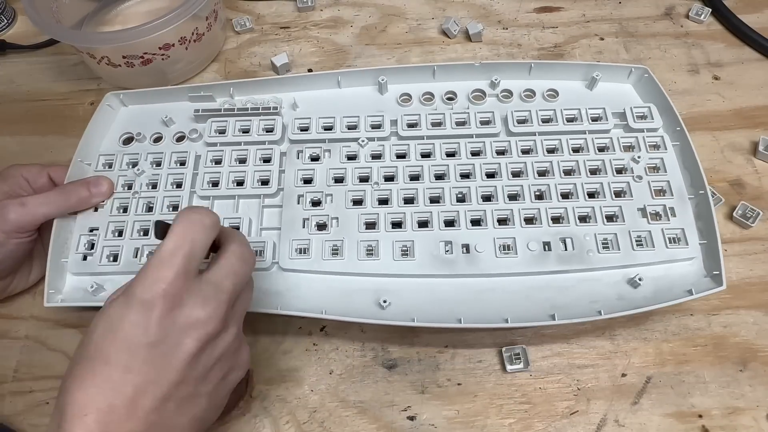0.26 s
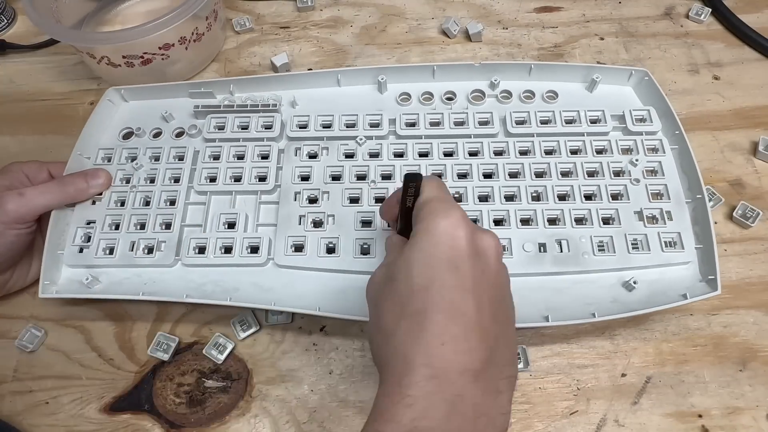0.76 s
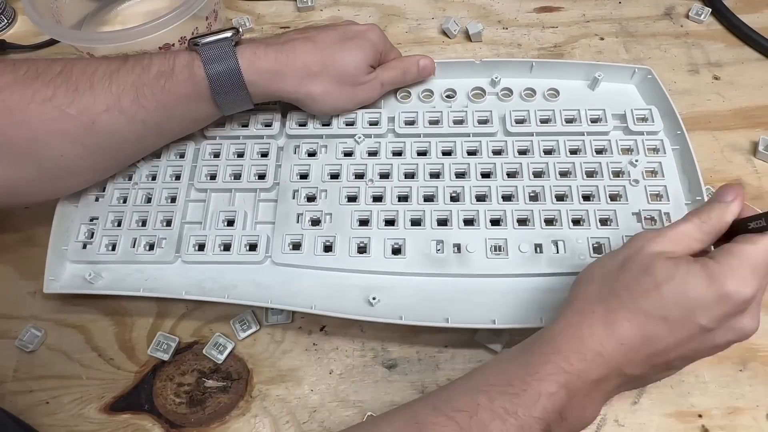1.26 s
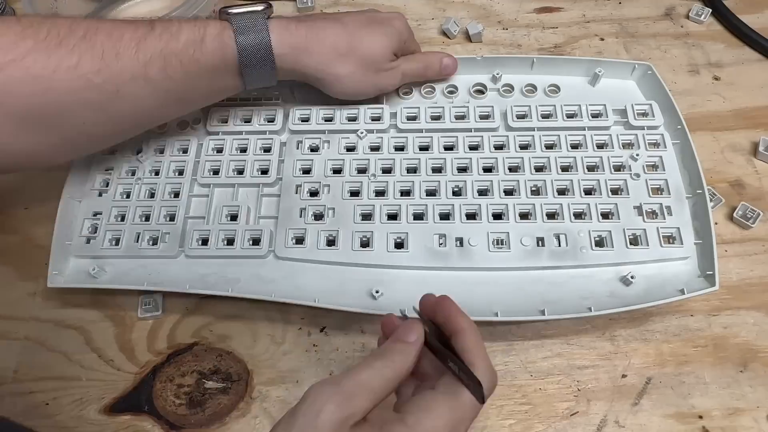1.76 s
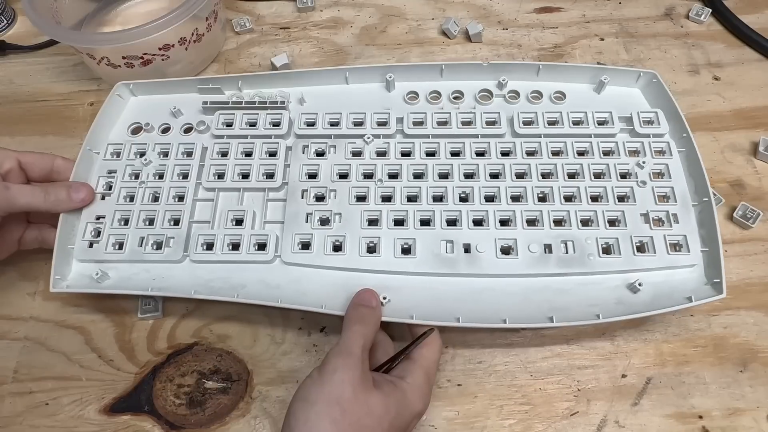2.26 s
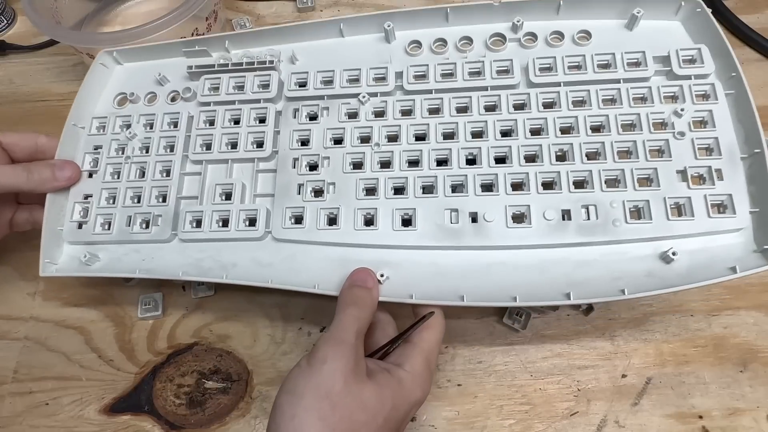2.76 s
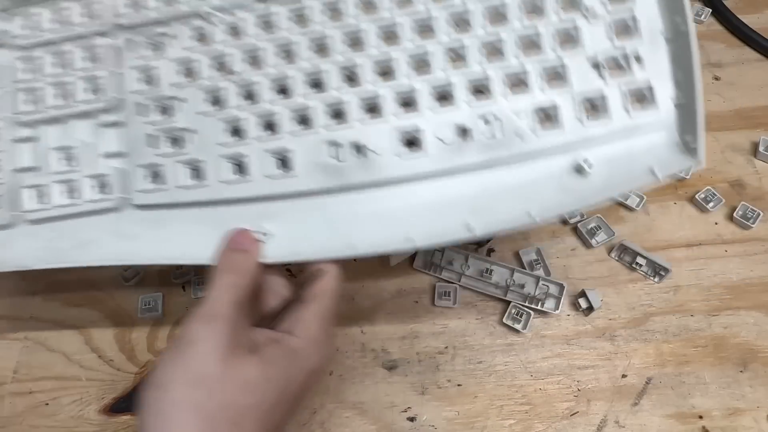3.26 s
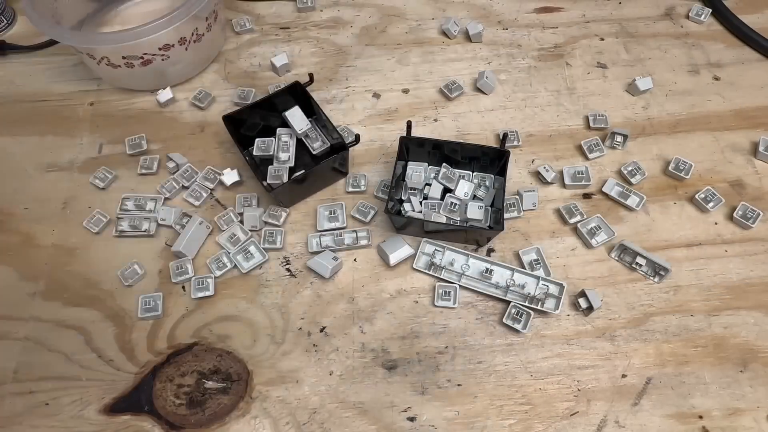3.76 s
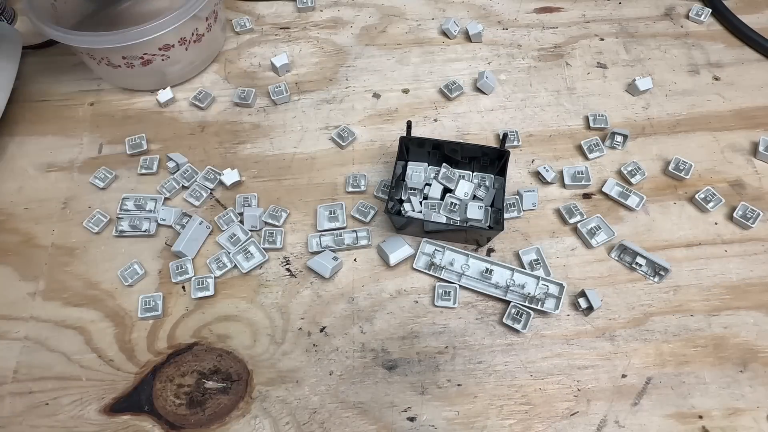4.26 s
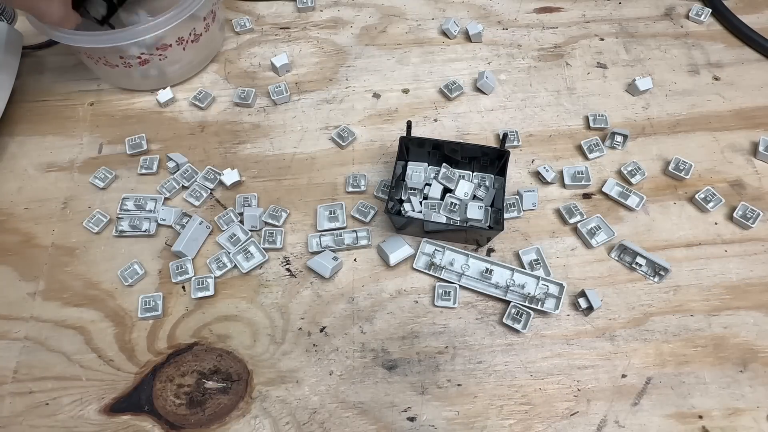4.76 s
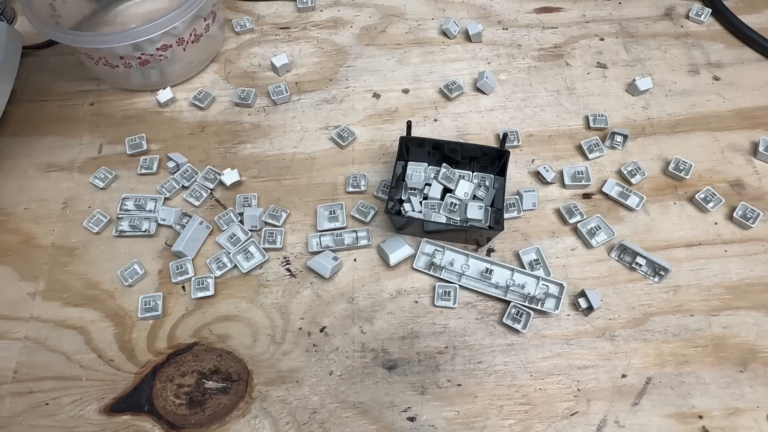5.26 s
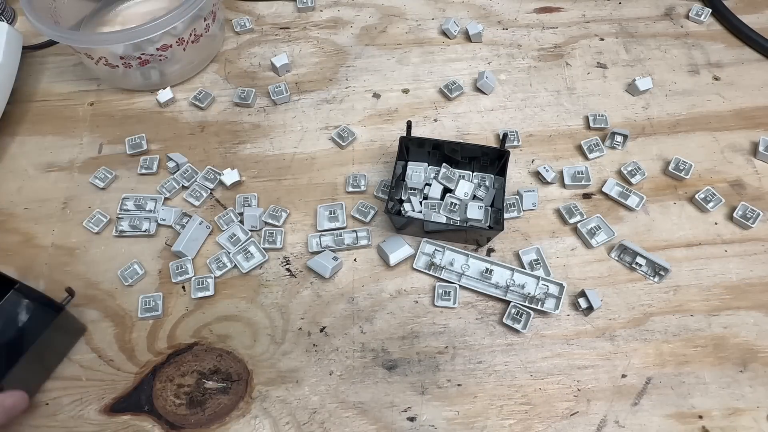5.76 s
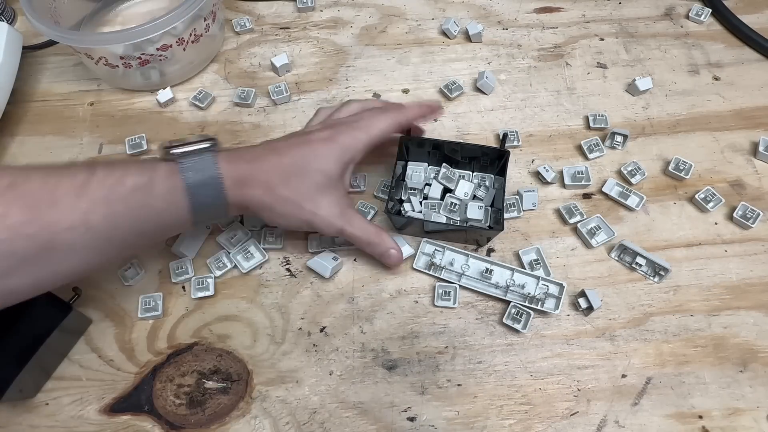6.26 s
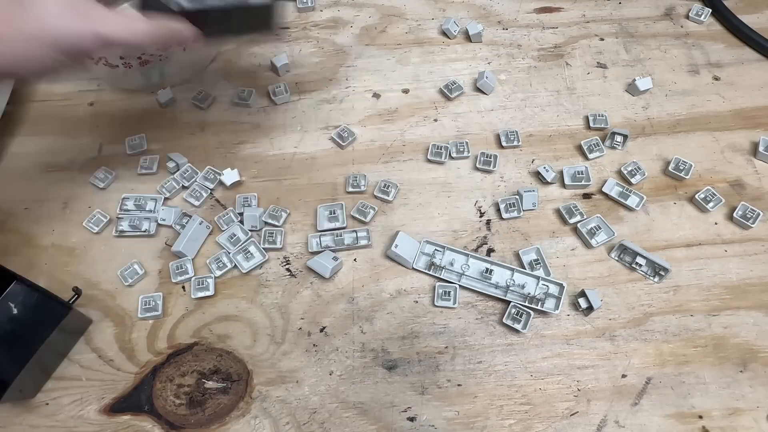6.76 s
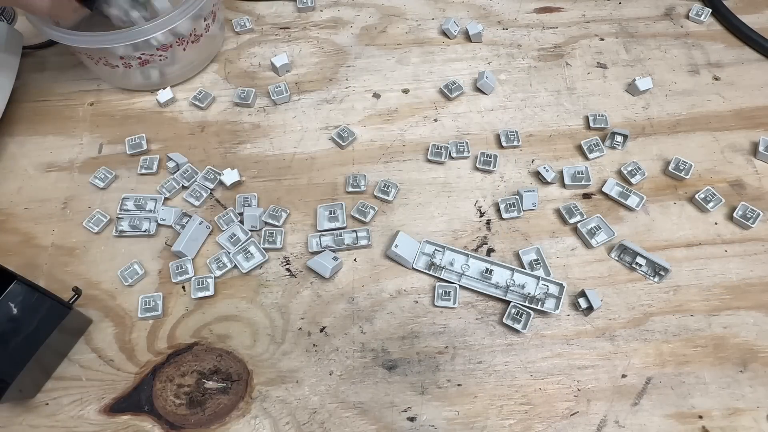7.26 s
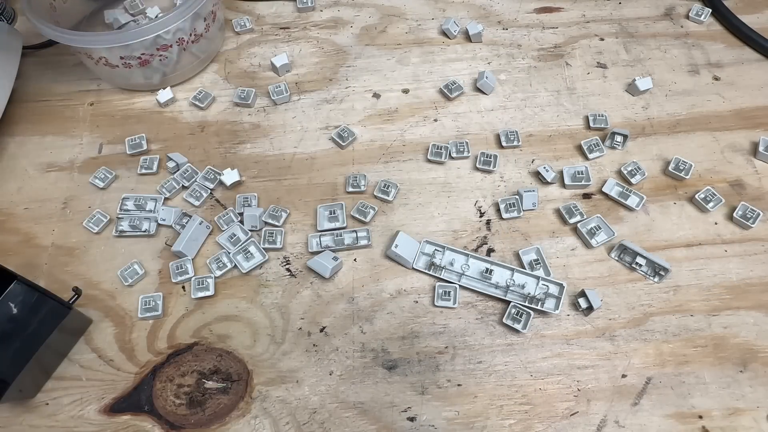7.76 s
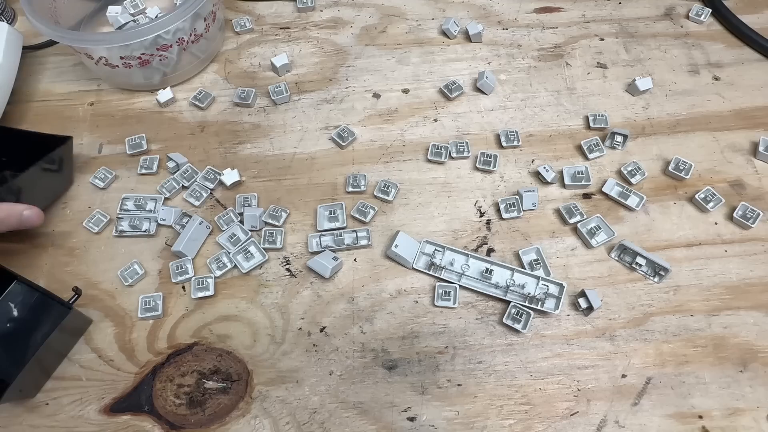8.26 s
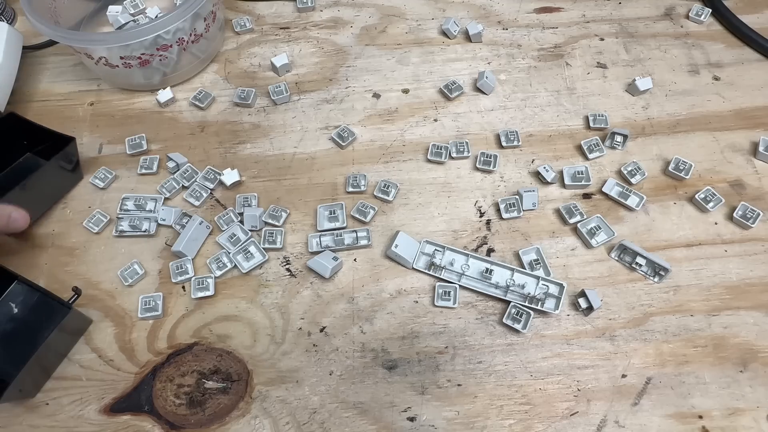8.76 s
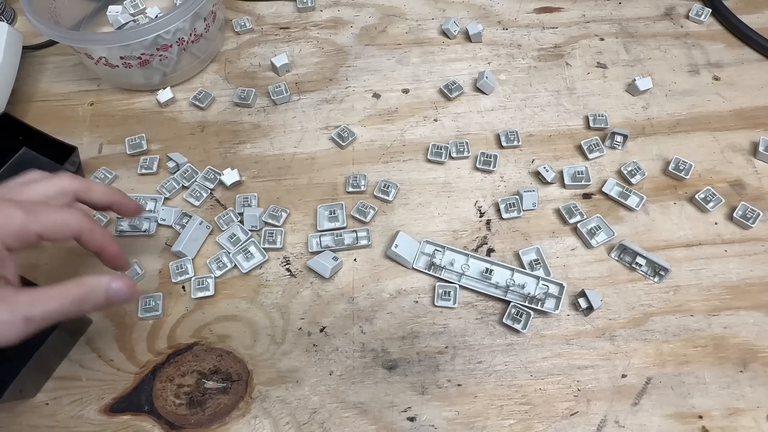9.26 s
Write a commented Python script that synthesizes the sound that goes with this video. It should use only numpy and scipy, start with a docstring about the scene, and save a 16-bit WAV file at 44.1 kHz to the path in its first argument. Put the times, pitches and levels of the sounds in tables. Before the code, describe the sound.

A close, fairly dry pickup at a wooden bench in a small room with faint low ventilation rumble and hiss. From 0 to 2 seconds, keycaps are pried out of a plastic keyboard: choppy snaps and clicks in brief slices, strongest between about 0.85 and 1.2 and again near 1.9. A light knock falls at 2.3, then near quiet. Soft hand brushing passes around 3.3 to 3.7. From 3.9 a small box of caps rattles increasingly, then pours at 4.65 into a plastic tub in a bright, hollow clatter, thinning by 5.1. The empty box knocks down at 5.7 and 5.8. At 6.3 a second box is jolted sharply, rattles lightly from 6.7, surges at 7.1 and pours from 7.25 to about 7.6, with last stragglers near 7.8. Several woody plastic knocks follow from 8.0 to 8.9, then a faint brush at 9.3 to 9.5.

```python
"""Keycaps are pried out of a keyboard at a workshop bench, in short slices of clatter that fade in and out.
A knock and brushing hands follow; a small open box of caps rattles, pours into a plastic tub and is set down.
A second box is jolted, rattled, poured and set down with several knocks; hands brush past at the end.
Blows ring sets of decaying sine waves, crowds of blows make clatter, and shaped noise makes the brushing,
the ventilation rumble and the hiss; random echoes of a small room answer all but the slices and the air."""
import sys
import numpy as np
from scipy import signal
from scipy.io import wavfile
from scipy.ndimage import uniform_filter1d

SR = 44100
rng = np.random.default_rng(int(sys.argv[2]) if len(sys.argv) > 2 else 0)


def dump(signal):
    """Clip the signal to [-1, 1] and save it as 16-bit WAV at the path in sys.argv[1]."""
    limited = np.clip(np.atleast_2d(signal).T, -1, 1)
    pcm = np.round(limited * 32767).astype(np.int16)
    wavfile.write(sys.argv[1], SR, pcm)


N = 418950  # length in samples
KINDS = 32  # different versions of each blow
BAND_LIMIT_HZ = 15900

# Ventilation rumble and hiss, shape of the noise: f/Hz, relative level/dB per Hz
RUMBLE_SPECTRUM = [(8.8, -63), (15, -33), (27, -23), (34, -8), (42, -3), (59, 1), (87, -7), (103, -8),
                   (124, -22), (190, -29), (250, -59), (420, -120)]
HISS_SPECTRUM = [(100, -4), (160, -10), (350, -9), (1100, -15), (1700, -12), (2000, -5), (2500, -5),
                 (2900, -17), (5000, -21), (5600, -8), (6800, -8), (7800, -12), (8700, -31), (16000, -35)]
# Brief swells of the rumble: t/s, hold/s, level/dB
RUMBLE_SWELLS = [(.26, .01, -48), (.5, .2, -58), (.9, .7, -60), (1.22, .01, -52), (1.71, .03, -42),
                 (2.38, .02, -59), (3.67, .01, -54), (3.91, .01, -56), (4.84, .11, -53), (5.16, .01, -57),
                 (6.52, .02, -55), (7.43, .01, -52), (7.65, .01, -53), (8.3, .11, -57), (9.07, .01, -57),
                 (9.42, .02, -59)]
# How long the room echoes: f/Hz, time to fall 60 dB/s
ROOM_DECAY = [(100, 1), (500, 0.34), (1500, 0.37), (4000, .35), (8000, 0.094), (16000, 0.34)]
# Hands and sleeves brushing past: t/s, hold/s, swish level/dB, low rub level/dB
BRUSHES = [(3.056, .01, -73.5, -95), (3.33, .07, -69, -76), (3.56, .01, -66, -78), (3.615, .055, -55, -65),
           (3.72, .06, -63, -75), (5.46, .01, -78.5, -82), (5.685, .01, -64, -68), (9.28, .14, -73, -67),
           (9.5, .01, -63.5, -82)]
# Colour of the swish and of the low rub: f/Hz, relative level/dB per Hz
SWISH_SPECTRUM = [(880, -38), (1500, -3), (3310, -4.5), (3590, -6), (5380, 3), (11200, -22.5),
                  (14600, -12.5), (16000, -9)]
RUB_SPECTRUM = [(100, -45), (170, -1), (287, -8), (515, -4.5), (746, -21.5), (900, -27.5), (1170, -60),
                (1980, -120)]

# Ringing tones of each body, before random variation: f/Hz, relative level/dB, time to fall 60 dB/s
TUB_MODES = [(362, -11, 0.045), (454, -7, 0.07), (520, -2, 0.1), (615, 3, .06), (642.3, 4.5, .07),
             (693.8, 3, 0.09), (765, -2.5, 0.11), (860, -13, 0.022)]
BOX_MODES = [(1113, -17, 0.018), (1230, -10, 0.03), (1313, 0, .05), (1370, 1, 0.045), (1445, 0, 0.06),
             (1505, 2, 0.08), (1546, -5, 0.05), (1695, -11, 0.047)]
EMPTY_BOX_MODES = [(1054, -24, 0.039), (1116, -13, 0.073), (1227, -12, .07), (1291, 0, .09),
                   (1346, -3.5, .08), (1488, -0.5, 0.065), (1546, -11, 0.072), (1720, -11, 0.045),
                   (1880, -17, 0.04)]
BOX_FLOOR_MODES = [(626, -18, .05), (700, -14, .07), (744, 4, .16), (788, -16, .05), (895, -18, .05)]
WOOD_MODES = [(200, -7, .04), (250, -5, .04), (291.4, -2, .05), (343, -3, .04), (389, -3, .04),
              (441, -1, .06), (500, -3, .04), (580, -5, .04)]
THUMP_MODES = [(96.7, -9.5, .15), (125, 7.5, 0.33), (160, -22, 0.089)]
SHELL_MODES = [(310, -13, 0.018), (513, -6.5, .025), (634, -0.5, 0.03), (756, 3.5, 0.035), (906, -2, 0.013)]  # keyboard shell
# Outline filled with random tones, for caps, edge clicks and the duller snap of box on wood:
# f/Hz, relative level/dB
CAP_SPECTRUM = [(1120, -35), (1900, -12.5), (2340, -1), (3260, -2.5), (4750, -1.5), (5300, 3), (6770, -7),
                (7600, -30.5), (9880, -44), (16700, -120)]
EDGE_SPECTRUM = [(4470, -32), (7600, 5), (9220, -1), (10400, -6), (13300, -8.5), (16000, -13)]
CRACK_SPECTRUM = [(1120, -31), (1900, -8), (3350, -5), (3890, -3.5), (4230, -4), (9000, -46), (11700, -62),
                  (19800, -120)]

# Box or shell meeting the bench: t/s, then level/dB of wood, thump, box floor, empty box, crack
BENCH_KNOCKS = [(2.309, -41, -59, -58, -30.5, -40.5), (5.704, -36, -62, -38, -22.5, -60),
                (5.805, -31.5, -57, -36, -11, -40), (6.296, -38, -54, -65, -50, -50),
                (8.022, -59, -62, -66, -50, -47), (8.105, -33, -53, -50, -28, -30),
                (8.155, -46, -52, -59, -41, -44), (8.189, -55, -52, -62, -47, -45),
                (8.275, -32, -48.5, -49, -38, -42.5), (8.314, -35.5, -50, -44, -32, -50),
                (8.414, -45.5, -55, -51, -38, -44.5), (8.591, -33.5, -64, -50, -34, -43.5),
                (8.603, -42, -56, -44, -43, -54), (8.911, -35.5, -64, -28, -25, -65)]
# Fine rattle of things settling after a pour or a box set down: t/s, hold/s, level/dB, fall/dB per s
SETTLING = [(5.71, .05, -71, 100), (5.85, .04, -60, 120), (7.8, .1, -71, 30), (8.12, .05, -70, 40),
            (8.28, .05, -70, 40), (8.6, .02, -73, 40), (8.92, .02, -80, 40)]
# A full box carried and tilted: start t/s, end t/s, start level/dB, end level/dB
CARRIED_BOXES = [(3.87, 4.64, -66, -46), (6.66, 7.09, -74, -62)]
# Added to the settling, carried and early handling clatter: level/dB of cap, tub, box, edge click
SETTLE_MIX = [0, 4, 3, -24]
RATTLE_MIX = [0, -10, 9, -24]
HANDLING_MIX = [-71, -69, -74, -90]
# Prying and falling caps: peak t/s, level/dB of shell, box, cap, basic time to fall 10 dB/s
PRY_SLICES = [(.042, -36.5, -35.5, -43, .016), (.0778, -62, -45, -39, .0044),
              (.1248, -41.5, -44.5, -50, .0063), (.2563, -49, -45.5, -51, .013),
              (.3015, -45.5, -43, -45, .0055), (.3465, -50, -42.5, -46, .0044),
              (.3985, -50, -42.5, -40, .012), (.4611, -44.5, -37.5, -39.5, .009),
              (.4986, -61, -61, -49, .0077), (.532, -62, -54, -59, .009), (.5544, -43, -40, -36, .0085),
              (.6412, -47, -37, -31.5, .005), (.665, -62, -48, -49, .011), (.7322, -63, -69, -56, .019),
              (.7505, -65, -61, -50, .0043), (.774, -52, -46, -51, .0086),
              (.7981, -46.5, -51, -48.5, .0076), (.8237, -50, -59, -67, .004),
              (.858, -30, -26.5, -23, .0095), (.912, -62.5, -59, -80, .014), (.9595, -32, -27.5, -25, .012),
              (.99, -57, -52.5, -46, .0072), (1.0349, -57, -75, -55, .013), (1.0699, -51, -67, -59, .0062),
              (1.0907, -32.5, -24, -25, .011), (1.1555, -61.5, -58.5, -70, .023),
              (1.197, -39, -24, -25.5, .011), (1.223, -62, -43.4, -40, .0054),
              (1.2766, -59.5, -63.5, -64, .008), (1.3242, -56, -58, -68, .008),
              (1.347, -53, -54.5, -59, .027), (1.3959, -52, -52, -55, .0083),
              (1.4523, -46.5, -44.5, -40, .011), (1.5338, -69, -64.5, -64, .0067),
              (1.5649, -58, -64, -68, .0125), (1.6342, -56, -50.5, -57, .027),
              (1.713, -33.5, -35.5, -29, .012), (1.792, -37, -44, -47, .0095),
              (1.9041, -37, -25, -19.5, .007), (1.9912, -59, -51.5, -51, .0043)]
# Caps knocking about in a box: t/s, level/dB of cap, box, edge click
BOX_RATTLES = [(3.3233, -53.5, -63, -75), (3.3643, -51, -55.5, -79), (3.5594, -43.5, -60.5, -57),
               (3.6125, -47, -51, -48), (3.6465, -56, -61, -44), (3.8587, -52, -49, -85),
               (3.8708, -48, -41, -79), (3.881, -46, -41, -79), (3.9137, -40, -38, -69),
               (3.924, -44, -34, -70), (3.9633, -45, -40, -66), (3.984, -21.5, -25.5, -47),
               (4.0145, -41, -31, -66), (4.0696, -37, -41, -65), (4.095, -30.5, -31.5, -55),
               (4.141, -31.5, -31, -62), (4.154, -31, -31, -56), (4.184, -36, -30, -62),
               (4.193, -18, -19, -45), (4.2614, -48, -28, -67), (4.2838, -41, -41, -67),
               (4.3058, -37.5, -43, -73), (4.353, -51, -41, -66), (4.3797, -30, -27, -46),
               (4.4087, -16, -21.5, -26), (4.4845, -27.5, -20, -58), (4.5271, -24, -23.5, -48),
               (4.559, -13, -18, -26), (4.6084, -25, -40, -34), (4.6355, -26, -45, -37),
               (5.7294, -42, -43, -78), (5.7608, -44, -37, -64), (5.7967, -27, -29.5, -69),
               (5.8397, -30.5, -29, -64), (5.9104, -52, -42.5, -83), (6.27, -40.5, -43, -51),
               (6.2942, -16.5, -33, -27), (6.337, -23, -32, -41), (6.3659, -34, -28, -57),
               (6.3919, -33.5, -41, -56), (6.4287, -45, -47, -68), (6.4664, -40, -55.5, -61),
               (6.4852, -38, -52, -54), (6.5221, -45.5, -55.5, -73.5), (6.678, -55, -45, -64),
               (6.7132, -30.5, -36.5, -66), (6.795, -46, -41, -76), (6.848, -40.5, -45, -68),
               (6.8725, -41, -35.5, -70), (6.933, -35, -50, -67), (6.9581, -36, -36, -62),
               (6.976, -36, -40, -58), (7.0074, -34.5, -35, -60), (7.0318, -32.5, -45, -59),
               (7.1017, -13, -45.5, -36), (7.1177, -12.5, -38, -28), (7.1444, -17, -36, -34),
               (7.17, -20, -33, -29), (7.197, -19, -20, -45)]
# Caps jolted along the box: t/s, hold/s, level/dB, basic fall/dB per s
BOX_JOLTS = [(6.296, .004, -38, 600), (6.34, .01, -48, 110), (6.935, .1, -52, 300), (7.1, .13, -38, 500)]
# Surges of caps pouring into the tub: t/s, hold/s, level/dB, basic fall/dB per s
TUB_POURS = [(4.658, .006, -21, 700), (4.692, .006, -22, 700), (4.75, .19, -30, 140), (7.25, .04, -30, 200),
             (7.285, .14, -24.5, 110), (7.5, .15, -42, 450), (7.76, .004, -43, 600)]
# Added to the jolts and the pours: level/dB of cap, tub, box, edge click
JOLT_MIX = [0, -10, 2, -10]
POUR_MIX = [0, 1.5, -5, -9]
# Caps landing in the tub: t/s, level/dB of cap, tub, edge click
TUB_DROPS = [(4.6598, -13.5, -13.5, -34), (4.6874, -9.5, -27, -30), (4.7167, -17, -33, -28),
             (4.7468, -14, -12.5, -14), (4.7824, -15.5, -20, -27.5), (4.8145, -13.5, -33, -27),
             (4.8484, -25, -13.5, -45), (4.8773, -13.5, -21, -33), (4.8874, -19.5, -22, -26),
             (4.9287, -14, -17, -33), (4.9412, -23, -15.5, -25), (4.9751, -26, -23, -44),
             (5.0302, -30, -44, -51), (5.0774, -37, -41, -59), (5.1476, -34, -50, -58),
             (7.2494, -16, -20.5, -24), (7.2804, -16.5, -22, -21.5), (7.2964, -10.5, -20, -26.5),
             (7.3154, -8.5, -19, -29.5), (7.3482, -34, -14, -39), (7.3891, -14, -18, -34),
             (7.4317, -16, -23.5, -36.5), (7.4514, -18, -24, -31), (7.4949, -25, -17, -28),
             (7.5997, -25, -38, -36), (7.7603, -34, -32, -56), (7.8042, -51, -43, -74)]


def amp(db):
    """Turns decibels into a plain multiplier of the wave."""
    return 10 ** (np.asarray(db) / 20)


def evened(x):
    """Scales a sound to an average strength (rms) of 1."""
    return x / np.sqrt(np.mean(x ** 2) + 1e-20)


def read(points, hz):
    """Reads a value between table points, with pitch spaced by ratio as the ear hears it."""
    f, value = np.transpose(points)
    return np.interp(np.log(hz + 1), np.log(f + 1), value)


def shaped(rows, rise, fall=None, haste=1):
    """Loudness that rises, holds and falls in dB per second; the powers of overlapping rows add."""
    t, rows = np.arange(0, N, 32) / SR, np.array(rows)  # every 32nd sample is enough
    start, hold, db = rows.T[:3, :, None]
    fall = haste * (rows[:, -1:] if fall is None else fall)
    before = np.maximum(start - t, 0)
    after = np.maximum(t - start - hold, 0)
    power = amp(2 * (db - rise * before - fall * after)).sum(axis=0)
    return np.interp(np.arange(N) / SR, t, np.sqrt(power))


def noise(spectrum, size, patchy_db):
    """Random noise coloured by a spectrum, uneven in drifting patches of time and pitch; rms 1."""
    frames, hz = 4 * N // size + 5, np.fft.rfftfreq(size, 1 / SR)
    real, imaginary, patches = rng.standard_normal((frames, len(hz), 3)).T
    patches = uniform_filter1d(patches, size=12, axis=0)  # smooth over pitch
    patches = evened(uniform_filter1d(patches, size=10, axis=1))  # smooth over time
    level_db = read(spectrum, hz)[:, None] + patchy_db * patches
    z = (real + 1j * imaginary) * amp(level_db)
    return evened(signal.istft(z, nperseg=size, noverlap=3 * size // 4)[1][:N])


def scattered(spectrum, low_hz, high_hz, t60, count):
    """Small hard things ring at many random pitches: a different set for each kind of blow."""
    hz = np.exp(rng.uniform(np.log(low_hz), np.log(high_hz), (KINDS, count)))
    return np.stack([hz, read(spectrum, hz), t60 * rng.uniform(0.63, 1.6, hz.shape)], axis=2)


def rings(modes, contact_ms, spread_db, detune):
    """Blows at different spots wake a body's tones unevenly through a short rough contact; peak 1."""
    modes = np.broadcast_to(modes, (KINDS, *np.shape(modes)[-2:]))
    hz, db, t60 = (modes[:, :, k, None] for k in range(3))
    t = np.arange(round(SR * t60.max()) + 200) / SR
    db = db + spread_db * rng.standard_normal(db.shape)
    pitch = hz * (1 + detune * rng.standard_normal(db.shape))
    ring = (amp(db - 60 * t / t60) * np.sin(2 * np.pi * pitch * t)).sum(axis=1)
    u = np.arange(800) * 1000 / SR / contact_ms
    contact = rng.standard_normal((KINDS, len(u))) * u ** .3 * np.exp(-u)
    ring = signal.fftconvolve(ring, contact, axes=1)
    edges = [.85 * hz.min(), min(1.2 * hz.max(), .45 * SR)]  # a body radiates only near its modes
    ring = signal.sosfilt(signal.butter(4, edges, "band", fs=SR, output="sos"), ring)
    return ring / abs(ring).max(axis=1, keepdims=True)


def played(times, levels_db, bodies):
    """Each blow rings every body at its own level, in a randomly picked version."""
    out = np.zeros(N + SR)
    kinds = rng.integers(0, KINDS, (len(times), len(bodies)))
    starts = np.round(times * SR).astype(int)
    for at, gains, kind in zip(starts, amp(levels_db), kinds):
        for gain, body, k in zip(gains, bodies, kind):
            out[at:at + body.shape[1]] += gain * body[k]
    return out[:N]


def patter(bodies, per_s, spread_db, end_s):
    """A random stream of uneven blows rings all the bodies; each has rms 1 up to about end_s."""
    at = np.flatnonzero(rng.random(round(end_s * SR)) < per_s / SR)
    size_db = spread_db * np.minimum(rng.exponential(1, (len(at), 1)), 4)
    size_db = size_db + 3.0 * rng.standard_normal((len(at), len(bodies)))
    streams = [played(at / SR, size_db[:, [k]], [body]) for k, body in enumerate(bodies)]
    return np.array([evened(x) * np.sqrt(end_s * SR / N) for x in streams])


def air():
    """Ventilation is low noise that comes and goes, plus a steady hiss."""
    steady_db, waver_db, hiss_db = -64, 2.5, -73
    swells = shaped(RUMBLE_SWELLS, rise=160, fall=240)  # dB/s
    level = np.hypot(amp(steady_db), swells)
    rumble = level * noise(RUMBLE_SPECTRUM, size=4096, patchy_db=waver_db)
    return rumble + amp(hiss_db) * noise(HISS_SPECTRUM, size=1024, patchy_db=0.0)


def room(x):
    """Three random echo sets fade into one another at a steady rate, so no pitch stands out."""
    taps = np.zeros((3, SR // 2))
    at = np.arange(200, SR // 2 - 20, 20)
    at = at + rng.integers(0, 20, (3, len(at)))
    np.put_along_axis(taps, at, rng.choice([-1., 1.], at.shape), 1)
    hz, t, z = signal.stft(taps, SR, nperseg=256)
    decay = amp(-60 * t / read(ROOM_DECAY, hz)[:, None])  # each pitch dies at its own speed
    tails = signal.istft(z * decay, SR, nperseg=256)[1]
    cycles = 3.7 * np.arange(N) / SR + np.arange(3)[:, None] / 3  # 3.7 rounds a second
    turns = np.sqrt(2 / 3) * np.cos(2 * np.pi * cycles)
    tails = tails / np.linalg.norm(tails[0])
    return signal.fftconvolve(x * turns, tails, axes=1)[:, :N].sum(axis=0)


def brushing():
    """Hands and sleeves sliding past make a soft high swish and a low rub of noise."""
    strokes, out = np.array(BRUSHES), np.zeros(N)
    for column, colour in ((2, SWISH_SPECTRUM), (3, RUB_SPECTRUM)):
        level = shaped(strokes[:, [0, 1, column]], rise=250, fall=200)  # dB/s
        out += level * noise(colour, size=256, patchy_db=3.5)
    return out


def bench_knocks():
    """A box or shell meeting the bench wakes wood, a low thump, the box and a dull crack."""
    wood = rings(WOOD_MODES, contact_ms=.8, spread_db=7.5, detune=.041)
    thump = rings(THUMP_MODES, contact_ms=2.5, spread_db=0.0, detune=.012)
    floor = rings(BOX_FLOOR_MODES, contact_ms=.15, spread_db=1.5, detune=.006)
    empty = rings(EMPTY_BOX_MODES, contact_ms=.36, spread_db=1.5, detune=.015)
    crack_modes = scattered(CRACK_SPECTRUM, 1900, 8000, .016, count=50)
    crack = rings(crack_modes, contact_ms=2.2, spread_db=2.5, detune=0)
    knocks = np.array(BENCH_KNOCKS)
    return wood, played(knocks[:, 0], knocks[:, 1:], (wood, thump, floor, empty, crack))


def fine_rattle(bodies):
    """Many tiny blows blur into the rattle of carried boxes, settling things and faint early handling."""
    t = np.arange(N) / SR
    fine = patter(bodies, per_s=600, spread_db=3.5, end_s=9.1)
    carried = np.zeros(N)
    for start, end, start_db, end_db in CARRIED_BOXES:
        carried += amp(np.interp(t, (start, end), (start_db, end_db), -200, -200))  # else silent
    rattle = carried * (amp(RATTLE_MIX) @ fine)
    rattle += shaped(SETTLING, rise=300) * (amp(SETTLE_MIX) @ fine)
    return rattle + (t < 1.95) * (amp(HANDLING_MIX) @ fine)  # handling between the slices


def slices(box, cap, edge):
    """Dense clatter of pried caps opens and shuts around each peak; the treble dies first."""
    rise_s = .0065  # basic time to rise 10 dB
    bounce_s, bounce_db = .025, -25  # the freed cap lands just after each peak
    edge_db, edge_slope = -2, 1.2  # harder snaps are brighter
    haste = np.array([[.9], [.9], [1.1], [1.3]])  # fade speed of shell, box, cap, edge
    shell = rings(SHELL_MODES, contact_ms=1.3, spread_db=3.5, detune=.065)
    streams = patter((shell, box, cap, edge), per_s=1400, spread_db=2.6, end_s=2.2)
    power, t = np.zeros((4, N)), np.arange(round(2.2 * SR)) / SR
    for peak, shell_db, box_db, cap_db, fall_s in PRY_SLICES:
        near = slice(max(round(peak * SR) - SR // 10, 0), round(peak * SR) + SR // 5)
        for at, less_db in ((peak, 0), (peak + bounce_s, bounce_db)):
            db = np.array([shell_db, box_db, cap_db]) + less_db
            db = np.r_[db, edge_db + edge_slope * db[-1]][:, None]
            fade_s = np.maximum(np.where(t[near] < at, rise_s, fall_s), 1 / 1000)
            away = abs(t[near] - at) / fade_s
            power[:, near] += amp(2 * (db - 10 * haste * away ** 1.7))
    return (np.sqrt(power) * streams).sum(axis=0)


def box_rattles(cap, tub, box, edge):
    """Single caps hit the box, with the tub's tones as a hollow low ring under it."""
    t, cap_db, box_db, edge_db = np.transpose(BOX_RATTLES)
    hollow_db = box_db - 17
    return played(t, np.c_[cap_db, hollow_db, box_db, edge_db], (cap, tub, box, edge))


def tumbled(rows, mix_db, streams):
    """Tumbling caps swell and fade in surges; the last stream, the edge clicks, dies first."""
    rise = 2500  # dB/s
    low = amp(mix_db[:-1]) @ streams[:-1]
    high = amp(mix_db[-1]) * streams[-1]
    return shaped(rows, rise) * low + shaped(rows, rise, haste=1.6) * high


def tumbling(bodies):
    """A coarse crowd of blows makes caps jolting along the box and pouring into the tub."""
    coarse = patter(bodies, per_s=420, spread_db=2.8, end_s=7.9)
    return tumbled(BOX_JOLTS, JOLT_MIX, coarse) + tumbled(TUB_POURS, POUR_MIX, coarse)


def tub_drops(cap, tub, box, edge, wood):
    """Each cap rings the tub it lands in, the tipped box above it and the bench below."""
    t, cap_db, tub_db, edge_db = np.transpose(TUB_DROPS)
    levels_db = np.c_[cap_db, tub_db, cap_db - 12, edge_db, tub_db - 20]
    return played(t, levels_db, (cap, tub, box, edge, wood))


def scene():
    """All blows share the same bodies; the room answers everything but the slices and the air."""
    cap_modes = scattered(CAP_SPECTRUM, 1900, 7000, .016, count=45)
    cap = rings(cap_modes, contact_ms=2.4, spread_db=3.2, detune=0)
    edge_modes = scattered(EDGE_SPECTRUM, 8300, 15500, .013, count=40)
    edge = rings(edge_modes, contact_ms=1.3, spread_db=3.0, detune=0)
    tub = rings(TUB_MODES, contact_ms=.8, spread_db=4.0, detune=.04)
    box = rings(BOX_MODES, contact_ms=.8, spread_db=4.0, detune=.055)
    bodies = (cap, tub, box, edge)
    wood, near = bench_knocks()
    near += brushing() + fine_rattle(bodies)
    near += box_rattles(*bodies) + tumbling(bodies)
    near += tub_drops(*bodies, wood)
    echoes = amp(-8) * room(near)
    return (near + echoes + slices(box, cap, edge) + air())[None]


def record(dry):
    """A steep filter removes the highest treble."""
    lowpass = signal.firwin(255, BAND_LIMIT_HZ, window=("kaiser", 9), fs=SR)
    return signal.oaconvolve(dry, lowpass[None], "same")


dry = scene()
out = record(dry)
dump(out)
```